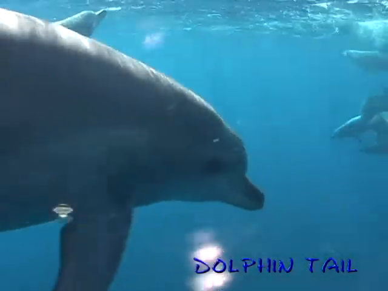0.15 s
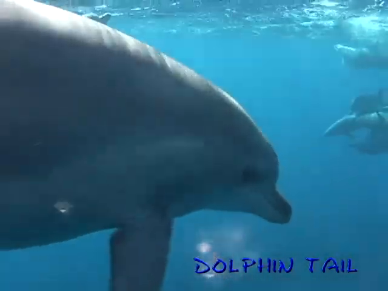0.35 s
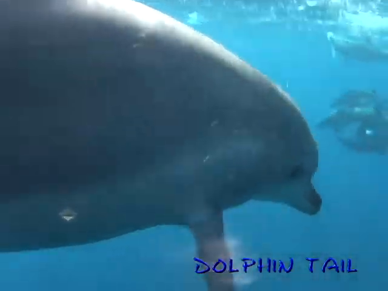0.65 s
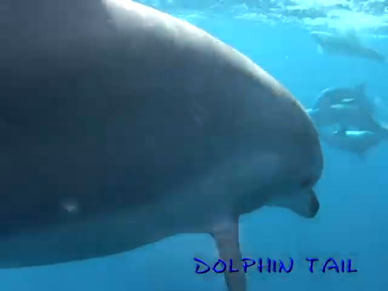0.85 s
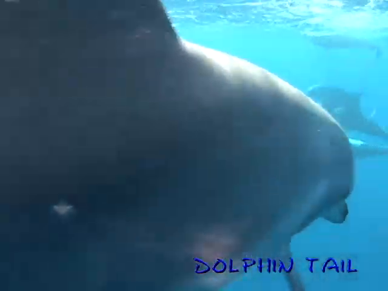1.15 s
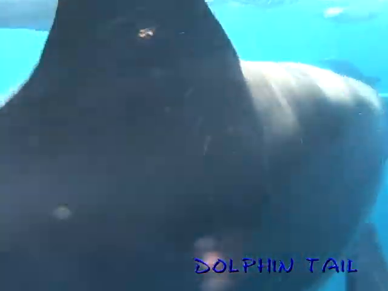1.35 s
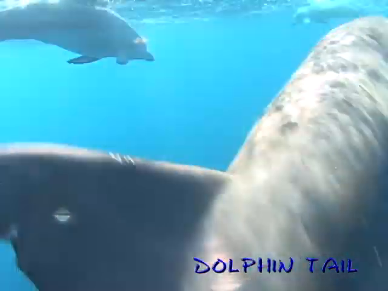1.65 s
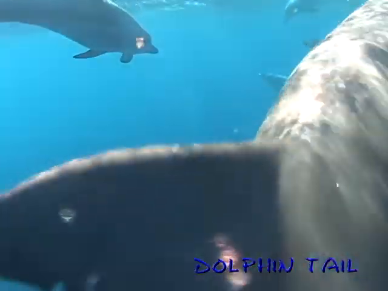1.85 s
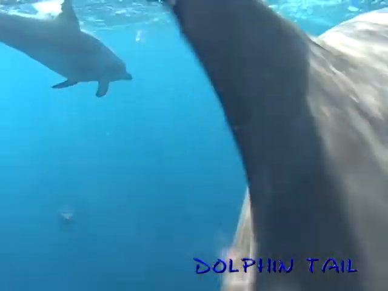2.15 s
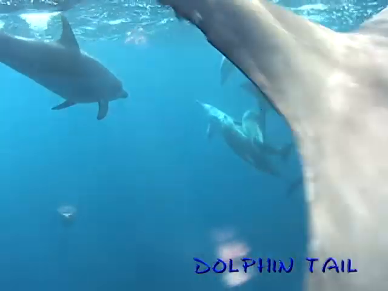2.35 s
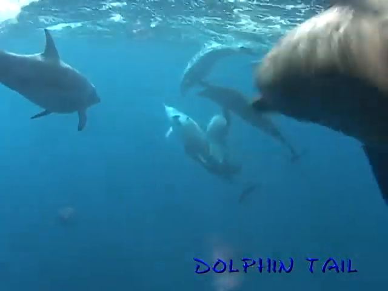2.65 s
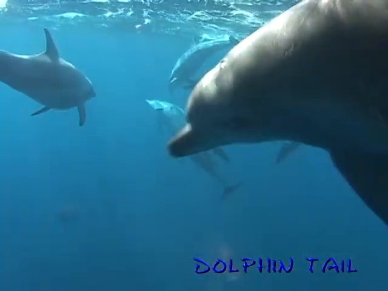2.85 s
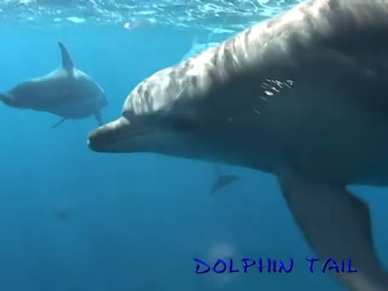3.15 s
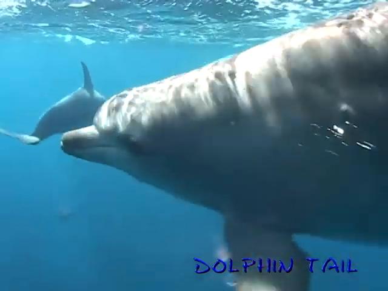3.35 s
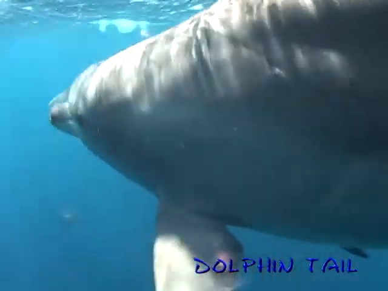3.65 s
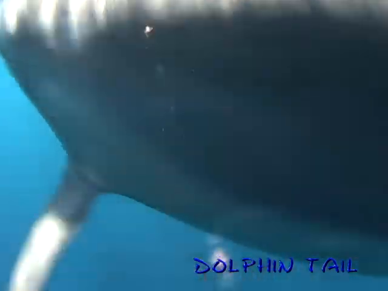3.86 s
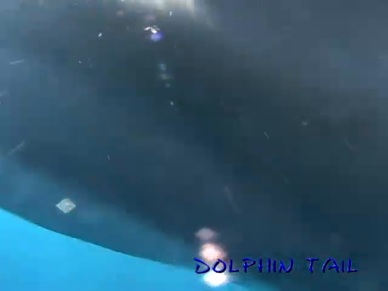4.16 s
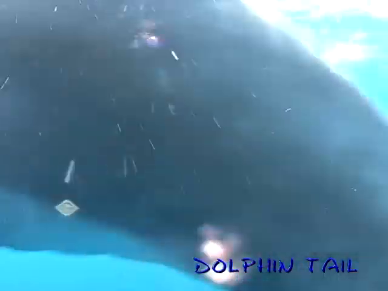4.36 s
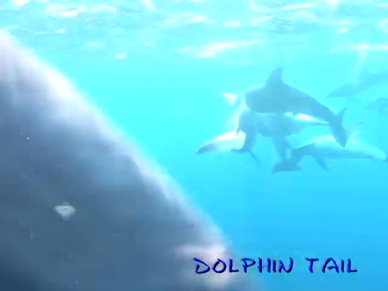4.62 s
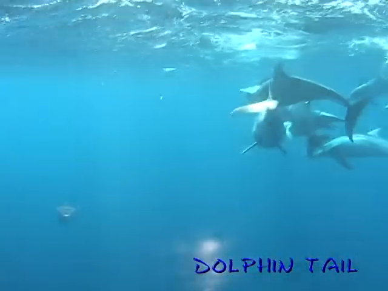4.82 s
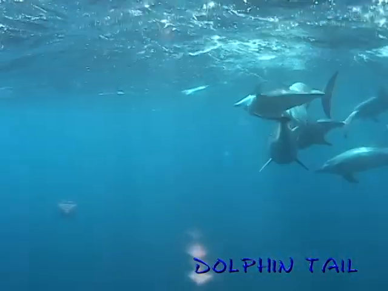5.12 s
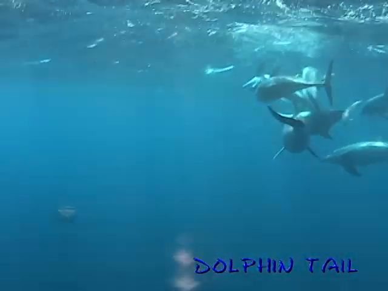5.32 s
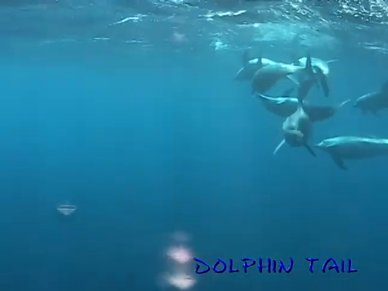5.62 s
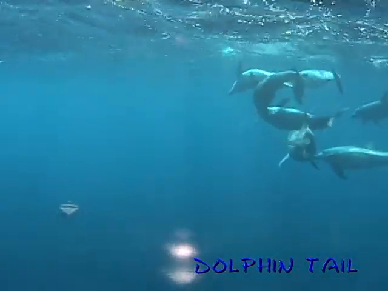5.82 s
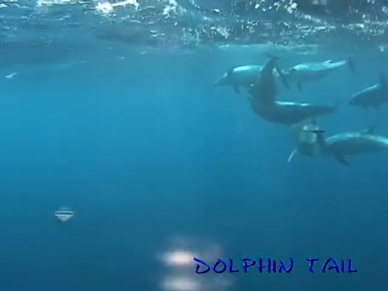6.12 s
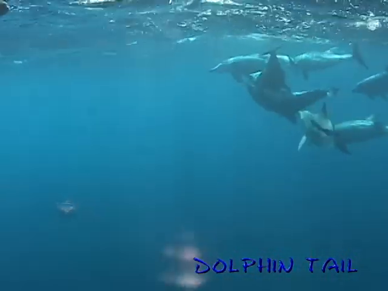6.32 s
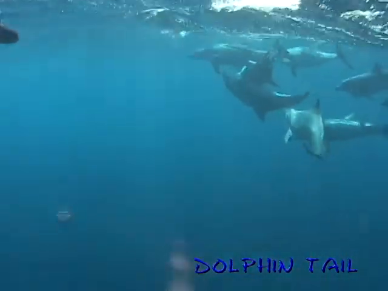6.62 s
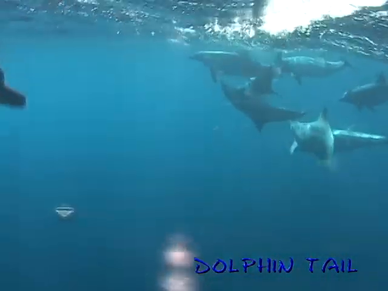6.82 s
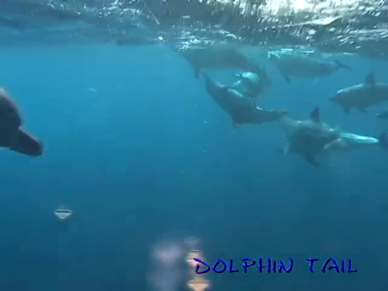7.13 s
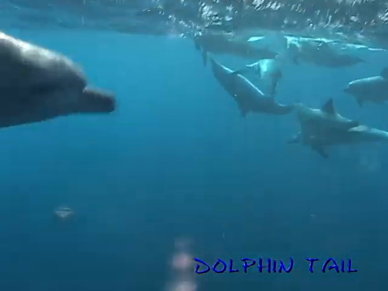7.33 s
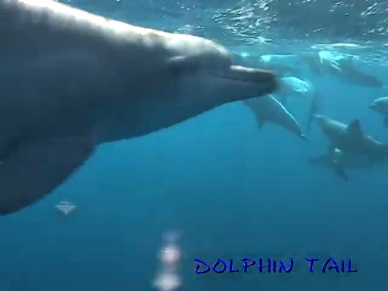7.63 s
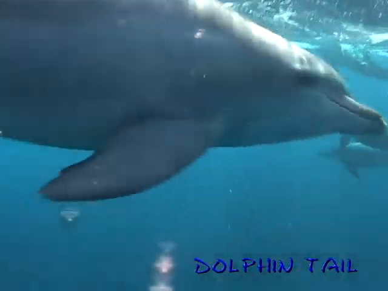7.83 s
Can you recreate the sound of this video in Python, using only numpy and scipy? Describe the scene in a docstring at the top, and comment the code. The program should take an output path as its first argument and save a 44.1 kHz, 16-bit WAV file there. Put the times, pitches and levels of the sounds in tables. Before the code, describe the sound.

A pod of dolphins whistles again and again in thin, rising and arching calls, heard underwater from inside a camera housing. A steady, fizzing water hiss swells now and then, with a faint motor hum, scattered clicks and dull bumps on the housing. From about three seconds come small bubble plinks, two short squawks and a few chirps. After a pause the whistles return near the end with a brief, slowing click train.

```python
"""A pod of dolphins swims past a camera in a watertight housing, just under the sea surface.
From the start, water hisses, fizzes and surges along the resonant housing, a small motor hums inside and
faint sonar clicks tick. Knocks, louder clicks and rising, arching whistles begin within half a second
and recur throughout. From 2.8 s the dolphins let out ringing bubbles and squawk twice; from 3.9 s brief
chirps surround the start of some whistles. Just after 7 s a click train passes, slowing as it goes."""
import sys
import numpy as np
from scipy import signal
from scipy.fft import rfft, irfft
from scipy.io import wavfile
from scipy.ndimage import uniform_filter1d

SR = 44100
rng = np.random.default_rng(int(sys.argv[2]) if len(sys.argv) > 2 else 0)


def transcribe(signal):
    """Save signal, clipped to [-1, 1], as a 16-bit WAV file at the path in sys.argv[1]."""
    frames = np.atleast_2d(signal).T
    limited = np.clip(frames, -1, 1)
    pcm = np.round(limited * 32767).astype(np.int16)
    wavfile.write(sys.argv[1], SR, pcm)


N = 351915
TIME = np.arange(N) / SR
BIN_HZ = np.maximum(np.arange(N // 2 + 1) * SR / N, 1)
OPPOSED = np.array([[1], [-1]])  # sign in the left and right channel
SINE_CREST = np.sqrt(2)


def from_db(db):
    """Amplitude ratio of a level."""
    return 10 ** (np.asarray(db) / 20)

def silence():
    """An empty stereo track."""
    return np.zeros((2, N))

def add(out, start_s, sound):
    """Superposition: a sound sums into the track."""
    i = max(int(start_s * SR), 0)
    out[:, i:i + sound.shape[-1]] += sound[..., :N - i]

def curves(rows):
    """Linear interpolation: the sample times that a table spans, then each column at those times."""
    times, *columns = np.transpose(rows)
    t = TIME[int(times[0] * SR):int(times[-1] * SR)]
    return [t] + [np.interp(t, times, column) for column in columns]

def fade(t, edge_s):
    """Envelope with a linear ramp at each end."""
    return np.clip(np.minimum(t - t[0], t[-1] - t) / edge_s, 0, 1)

def phase_of(hz):
    """Phase is the time integral of frequency."""
    return 2 * np.pi * np.cumsum(hz) / SR

def resonance(hz, centre, width):
    """Magnitude response of a damped resonator, 1 at its centre."""
    return 1 / np.sqrt(1 + ((hz ** 2 - centre ** 2) / (hz * width)) ** 2)

def ring(hz, t60, rise_s, climb=0, spread_rad=0.48):
    """Free vibration: a damped sine that reaches the two channels with different phases."""
    t = TIME[:SR // 3]
    envelope = from_db(-60 * t / t60) * -np.expm1(-t / rise_s)
    return envelope * np.sin(phase_of(hz * (1 + climb * t / t60)) + OPPOSED * spread_rad)

def shaped_noise(gain):
    """White noise filtered by a gain per frequency bin, at rms 1."""
    x = irfft(rfft(rng.standard_normal(N)) * gain, N)
    return x / np.std(x)

def stereo_noise(size):
    """White noise, partly correlated between the channels."""
    return rng.standard_normal(size) + .5 * rng.standard_normal((2, size))

def drift(per_s, size):
    """Continuous random modulation with a spread of about 1."""
    steps = rng.standard_normal(8000)
    return 1.2 * np.interp(np.arange(size) * per_s / SR, np.arange(len(steps)), steps)

def jumps(per_s, size):
    """Poisson process: a random value holds still, then leaps to a new one."""
    return rng.standard_normal(size)[np.cumsum(rng.random(size) < per_s / SR)]


def surges(calm_drone_db=-57, calm_hiss_db=-2):
    """Incoherent sources add in power: surges over calm water set the drone and hiss gains in dB."""
    # surges along the housing: (crest time [s], swell [s], drone gain [dB], hiss gain [dB], decay [dB/s])
    swells = [(0.0, .05, -39, -3.5, 20.5), (2.179, .05, -39, -1.5, 22), (3.93, .1, -51, 1.5, 12),
              (4.499, 0.403, -47, -7.5, 7.5), (6.521, .08, -51.5, 1, 18.5), (7.5, .05, -50.5, -1, 20)]
    drone, hiss = from_db(calm_drone_db), from_db(calm_hiss_db)
    for crest_s, swell_s, drone_db, hiss_db, decay in swells:
        age = TIME - crest_s
        flow = np.clip(1 + age / swell_s, 0, 1) * from_db(-decay * np.maximum(age, 0))
        drone = np.hypot(drone, from_db(drone_db) * flow)
        hiss = np.hypot(hiss, from_db(hiss_db) * flow)
    return 20 * np.log10([drone, hiss])

def water(drone_db, hiss_db, mid_db=-43, side_db=-44, lumpy_db=1.5, flicker_db=1.19, ripple_db=3.0):
    """Forced vibration: the housing's resonances colour the water's hiss and drone under each surge."""
    # hiss spectrum in phase in both channels: (frequency [Hz], relative level [dB])
    mid_spectrum = [(30, -69), (97, -8), (518, -5), (561, -5.5), (1200, -2), (1820, -4.5), (2760, -4.5),
                    (3780, -10), (7100, -9.5), (15500, -27)]
    # hiss spectrum in antiphase between them: (frequency [Hz], relative level [dB])
    side_spectrum = [(30, -19), (156, -13), (360, -8.5), (561, 17.5), (656, 1), (1200, -13.5), (2100, -9),
                     (15500, -28.5)]
    # notch and peaks that the housing gives the hiss: (frequency [Hz], bandwidth [Hz], gain [dB])
    hiss_bands = [(570, 134, -24), (985, 83, 4.5), (1541, 160, 9), (2800, 115, 7.5)]
    # resonances that a surge excites: (frequency [Hz], bandwidth [Hz], relative level [dB])
    modes = [(149, 48, -5), (634.5, 120, 2), (993, 23, -4.5), (1650, 150, -12)]
    colour = from_db(sum(db * resonance(BIN_HZ, hz, width) ** 2 for hz, width, db in hiss_bands))
    hisses = []
    for points, level_db in ((mid_spectrum, mid_db), (side_spectrum, side_db)):
        hz, db = np.transpose(points)
        spectrum = from_db(np.interp(np.log(BIN_HZ), np.log(hz), db))
        level = from_db(level_db + flicker_db * drift(40, N))
        ripple = from_db(ripple_db * drift(108.75, len(BIN_HZ)))  # many narrow resonances
        hisses.append(level * shaped_noise(spectrum * colour * ripple))
    mid, side = hisses
    body = np.sqrt(sum(from_db(db) ** 2 * resonance(BIN_HZ, hz, width) ** 3 for hz, width, db in modes))
    drone = shaped_noise(body) + 0.35 * OPPOSED * shaped_noise(body)
    drone *= from_db(drone_db + lumpy_db * drift(55, N))
    return from_db(hiss_db) * (mid + OPPOSED * side) + drone

def fizz(hiss_db, count=340, low_hz=550, high_hz=3600):
    """Tiny bubbles burst and ring as damped oscillators, denser and louder when the water is stirred."""
    out = silence()
    stirring = np.cumsum(from_db(hiss_db) ** 3)
    for when, pitch, strength in rng.random((count, 3)):
        i = np.searchsorted(stirring, when * stirring[-1])
        hz = low_hz * (high_hz / low_hz) ** pitch
        db = -44 + 9 * strength ** 3 + 2 * hiss_db[i]
        add(out, i / SR, from_db(db) * ring(hz, 22 / hz, rise_s=0.00012))
    return out

def motor(waver=0.00085):
    """Periodic motion gives a line spectrum: the camera's drive hums in two barely wavering tones."""
    # tones of the drive: (frequency [Hz], level [dB], phase lead of the right channel [rad])
    tones = [(571, -54.5, 2.36), (1732, -63.5, 0.79)]
    turn = phase_of(1 + waver * drift(20, N))
    return sum(SINE_CREST * from_db(db) * np.sin([hz * turn, hz * turn + lead]) for hz, db, lead in tones)

def clicks(band_hz=(2400, 8500), crack_s=.0012, rattle_s=0.007, rattle_db=-13, far_per_s=22, far_db=-31):
    """Impulse response: each sonar click, lone, far off or in a train, cracks and rattles the housing."""
    # lone sharp clicks: (time [s], peak level [dB])
    lone_clicks = [(.332, -26), (.62, -25), (.632, -23), (.992, -30), (1.54, -31), (2.035, -28),
                   (2.672, -30), (2.787, -20), (3.59, -24.5), (3.756, -22), (5.065, -31), (5.231, -22.5),
                   (5.874, -23.5), (6.507, -33), (7.46, -22.5)]
    # echolocation, one curve per train: (time [s], click rate [1/s], peak level [dB])
    trains = [
        [(7.10, 140, -31.5), (7.345, 69, -34.5)],
    ]
    impulses = (rng.random(N) < far_per_s / SR) * from_db(far_db - 10 * np.sqrt(rng.random(N)))
    for start_s, db in lone_clicks:
        impulses[int(start_s * SR)] = from_db(db)
    for rows in trains:
        t, rate, db = curves(rows)
        due = np.flatnonzero(np.diff(np.floor(np.cumsum(rate) / SR)))  # one click per cycle
        impulses[(t[due] * SR).astype(int)] = from_db(db[due] + 2 * rng.standard_normal(len(t))[due])
    t = TIME[:SR // 40]
    envelope = np.exp(-t / crack_s) + from_db(rattle_db) * np.exp(-t / rattle_s)
    band = signal.butter(2, band_hz, "band", fs=SR, output="sos")
    crack = signal.sosfilt(band, stereo_noise(len(t)) * envelope)
    return signal.oaconvolve(impulses[None], crack / np.abs(crack).max(), axes=1)[:, :N]

def knocks(thud_t60=0.054, thud_db=4, low_cut_hz=115):
    """An impact excites normal modes: a round thud of the whole housing and a short ring of its walls."""
    # knocks on the housing: (time [s], level [dB], thud frequency [Hz])
    impacts = [(.21, -26, 225), (1.554, -40.5, 223), (2.043, -34.5, 265), (3.608, -24.5, 201),
               (4.43, -35, 135), (4.554, -36, 134), (5.639, -40.5, 240), (6.245, -35, 232),
               (7.063, -32, 217), (7.486, -33, 220), (7.517, -32, 128)]
    # modes of the walls: (frequency [Hz], gain [dB], time to decay by 60 dB [s])
    wall_modes = [(470, 6, 0.02), (914, 1.5, 0.031), (1430, 23.5, 0.0039)]
    walls = sum(from_db(db) * ring(hz, t60, rise_s=0.0033) for hz, db, t60 in wall_modes)
    out = silence()
    for start_s, db, hz in impacts:
        thud = from_db(thud_db) * ring(hz, thud_t60, rise_s=0.0008)
        add(out, start_s, from_db(db) * (thud + walls))
    return signal.sosfilt(signal.butter(3, low_cut_hz, "high", fs=SR, output="sos"), out)

def surface_echoes(x, t60):
    """Scattering: the rippled surface returns a short cloud of echoes, partly different per channel."""
    t = TIME[:SR // 4]
    cloud = stereo_noise(len(t)) * from_db(-60 * t / t60)
    return signal.fftconvolve(x[None], cloud / np.linalg.norm(cloud[0]), axes=1)

def whistles(break_hz=9500, arch_s=.05, leap_hz=260, jitter_hz=130, flutter_db=5, near_db=-3, far_db=-29):
    """Frequency-modulated tones break up as they climb and interfere with their surface echoes."""
    # one curve per whistle, a loud climb to a faint top, mostly followed by a quick fall:
    # (time [s], frequency [Hz], level [dB])
    contours = [
        [(.498, 5020, -39), (.571, 5750, -20.5), (.583, 5950, -38), (.591, 6000, -22), (.63, 7400, -28),
         (.66, 8500, -32), (.735, 11200, -45), (.86, 15600, -130), (1.0, 11400, -45.5), (1.035, 8300, -37.5),
         (1.06, 4530, -46)],
        [(1.147, 4650, -31), (1.19, 5170, -38.5), (1.235, 5670, -28.5), (1.278, 6130, -25), (1.303, 7050, -35),
         (1.315, 7500, -29.5), (1.352, 11000, -46), (1.46, 17000, -78), (1.55, 14250, -53), (1.61, 11000, -46),
         (1.638, 7300, -33)],
        [(2.16, 4900, -49), (2.21, 5420, -35.5), (2.233, 6010, -27), (2.247, 7400, -37), (2.305, 8100, -41.5),
         (2.34, 9500, -49), (2.47, 15600, -60), (2.605, 14300, -50), (2.685, 8400, -34.5)],
        [(2.785, 4620, -29.5), (2.797, 5440, -24.5), (2.838, 5780, -11), (2.88, 6370, -15), (2.92, 7330, -18),
         (2.945, 8500, -26), (3.03, 13300, -38.5), (3.15, 16200, -75), (3.315, 14100, -38), (3.36, 10700, -41)],
        [(3.968, 4030, -27.5), (4.047, 5610, -32), (4.068, 5940, -17), (4.085, 6500, -28.5), (4.125, 7750, -39),
         (4.129, 7960, -27), (4.19, 11120, -42.5), (4.37, 15900, -62)],
        [(4.597, 5320, -38.5), (4.655, 5910, -22), (4.681, 6250, -29), (4.684, 5930, -19.5), (4.705, 6170, -25),
         (4.742, 6820, -18.5), (4.775, 8260, -35.5), (4.85, 11600, -39), (4.94, 14500, -65), (5.06, 14900, -58),
         (5.15, 8000, -51)],
        [(5.228, 4480, -33.5), (5.29, 6100, -32.5), (5.312, 6620, -25), (5.342, 7230, -26),
         (5.357, 7530, -38.5), (5.4, 8700, -37.5), (5.45, 11570, -46), (5.57, 14800, -68)],
        [(6.94, 4450, -48), (7.025, 5410, -32), (7.09, 6700, -18), (7.113, 7600, -43), (7.123, 8180, -22),
         (7.14, 9100, -53), (7.28, 15900, -72), (7.43, 14100, -63), (7.467, 8000, -33.5), (7.488, 5300, -32)],
        [(7.553, 6120, -38), (7.585, 5520, -30.5), (7.63, 6080, -24), (7.67, 7220, -27.5), (7.682, 7580, -37),
         (7.76, 12500, -50), (7.83, 15900, -57)],
    ]
    # unsteadiness of each whistle in turn: (roughness [0-1])
    roughness = [.34, .33, .75, .09, .34, .2, .33, .32, .3]
    direction = from_db(OPPOSED * 0.5) * np.exp(1j * OPPOSED * 0.27)  # left is louder and leads in phase
    out = silence()
    for rows, rough in zip(contours, roughness):
        t, hz, db = curves(rows)
        n = len(t)
        rounded = uniform_filter1d(hz, int(arch_s * SR), mode="nearest")
        hz = np.where(hz > break_hz, rounded, hz)
        shaky = np.clip((hz / break_hz) ** 4, rough, 1)  # fully unsteady above break_hz
        leap = np.tanh(jumps(120, n))
        hz = hz + leap_hz * shaky * leap + jitter_hz * rough * drift(900, n)
        flutter = flutter_db * shaky * (leap + drift(100, n) - 1)
        phase = phase_of(hz) + .45 * rough * drift(1500, n)  # phase noise gives a rough fringe
        fundamental = from_db(db + flutter) * np.exp(1j * phase)
        octave = from_db(-61 + flutter_db * drift(100, n)) * (hz < SR / 6) * np.exp(2j * phase)
        tone = SINE_CREST * fade(t, edge_s=0.0013) * (fundamental + octave)
        add(out, t[0], np.real(tone * direction))
        upward = shaky ** 2 * np.minimum(break_hz / hz, 1) ** 8  # top notes send little to the surface
        add(out, t[0], from_db(near_db) * surface_echoes(upward * tone.real, t60=.08))
        add(out, t[0], from_db(far_db) * surface_echoes(tone.real, t60=0.29))
    return out

def bubbles(climb=0.053, t60_at_khz=0.077, damping_power=1.69, low_cut_hz=220):
    """Bubble resonance: each rings at its own, slightly rising pitch; large, low ones ring longest."""
    # released bubbles: (time [s], initial level [dB], frequency [Hz])
    releases = [(2.825, -23, 2670), (2.827, -24, 1720), (3.248, -33.5, 1206), (3.287, -39, 1380),
                (3.503, -34, 1550), (3.686, -30.5, 1680), (3.856, -32, 717), (3.87, -38, 376.5),
                (3.903, -28.5, 1033), (4.056, -28.5, 1036), (4.14, -31, 709), (4.153, -24.5, 1923),
                (4.184, -30.5, 580), (4.186, -39, 330), (4.369, -25.5, 1760), (5.64, -37, 1620),
                (6.013, -28.5, 1273), (6.475, -21.5, 2390), (6.597, -35.5, 726), (6.765, -39, 686),
                (7.084, -33, 1620)]
    out = silence()
    for start_s, db, hz in releases:
        t60 = t60_at_khz * (1000 / hz) ** damping_power
        add(out, start_s, from_db(db) * SINE_CREST * ring(hz, t60, rise_s=0.0001, climb=climb))
    return signal.sosfilt(signal.butter(2, low_cut_hz, "high", fs=SR, output="sos"), out)

def squawks(uneven=0.25, octave_db=-25, flutter_db=1.8, top_hz=2350):
    """Source and filter: fast pulses, alternately strong and weak, pass through one resonance."""
    # one curve per squawk: (time [s], pulse rate [1/s], level [dB], resonance [Hz], bandwidth [Hz])
    calls = [
        [(2.832, 480, -27.5, 1830, 900), (2.858, 530, -34.5, 1680, 1700), (2.902, 490, -40, 1500, 1700)],
        [(4.14, 310, -41, 1960, 500), (4.22, 365, -36.5, 1940, 525), (4.33, 355, -39, 2010, 520),
         (4.435, 325, -48, 1990, 400)],
    ]
    out = silence()
    for rows in calls:
        t, rate, db, centre, width = curves(rows)
        phase = phase_of(rate + 20 * (rate / 500) ** 5 * drift(350, len(t)))  # the fastest turn raspy
        voice = 0
        for k in range(2, 20):  # multiples of half the pulse rate; alternation gives the odd ones
            gain = (uneven if k % 2 else 1) * resonance(k * rate / 2, centre, width) ** 2
            voice += gain * np.exp(.5j * k * (phase + k))
        voice = signal.sosfilt(signal.butter(8, top_hz, fs=SR, output="sos"), voice)
        voice /= np.std(voice.real)
        octave = from_db(octave_db) * voice ** 2
        envelope = from_db(db + flutter_db * drift(197, len(t))) * fade(t, edge_s=0.0015)
        voice = (voice + octave) * envelope
        add(out, t[0], np.real([voice, voice * np.exp(1j)]))  # right leads by 1 rad
    return out

def chirps(droop_hz_per_s=8000):
    """Linear frequency sweeps: brief tones swell, droop slightly in pitch and stop."""
    # chirps around the start of a whistle: (time [s], duration [s], frequency [Hz], level [dB])
    sweeps = [(3.911, 0.0057, 4280, -29.5), (3.944, 0.027, 4500, -35), (3.957, 0.03, 4000, -29),
              (4.04, .05, 2480, -41), (6.937, .03, 4550, -33), (7.537, 0.017, 4520, -29.5)]
    out = silence()
    for start_s, length_s, hz, db in sweeps:
        t = TIME[:int(length_s * SR)]
        phase = phase_of(hz - droop_hz_per_s * (t - t.mean()))
        envelope = SINE_CREST * from_db(db) * np.sin(np.pi * t / length_s)
        add(out, start_s, envelope * np.sin(phase))
    return out

def scene(right_db=5.0, right_hz=950, right_width_hz=1200):
    """The sources superpose; the housing passes the midrange of near ones more strongly to the right."""
    drone_db, hiss_db = surges()
    near = water(drone_db, hiss_db) + fizz(hiss_db) + bubbles() + knocks() + motor()
    lean = from_db(right_db / 2 * resonance(BIN_HZ, right_hz, right_width_hz) ** 2)
    near = irfft(rfft(near) * [1 / lean, lean], N)
    return near + whistles() + chirps() + squawks() + clicks()

def record(dry, cutoff_hz=15750):
    """A linear-phase low-pass filter cuts the top steeply."""
    low_pass = signal.firwin(601, cutoff_hz, fs=SR)
    return signal.fftconvolve(dry, low_pass[None], mode="same", axes=1)


dry = scene()
out = record(dry)
transcribe(out)
```